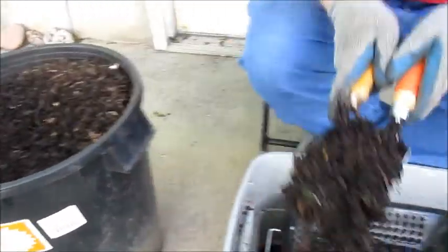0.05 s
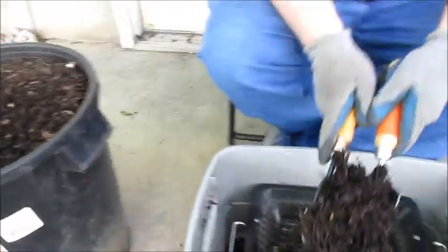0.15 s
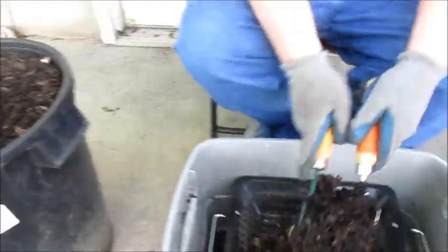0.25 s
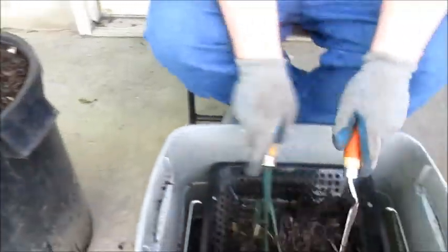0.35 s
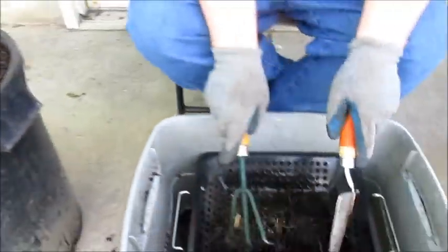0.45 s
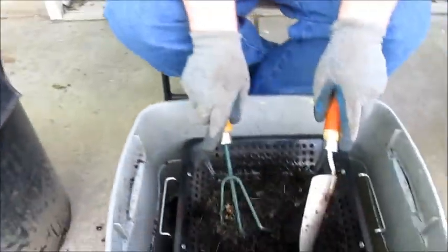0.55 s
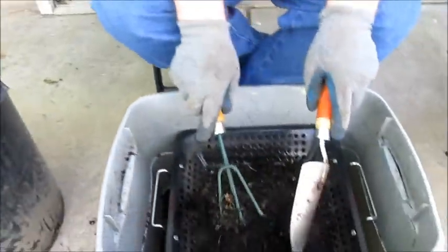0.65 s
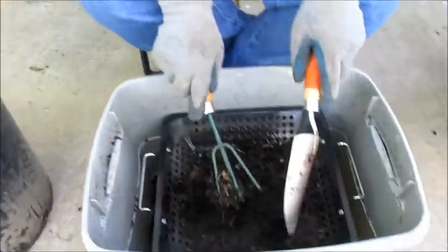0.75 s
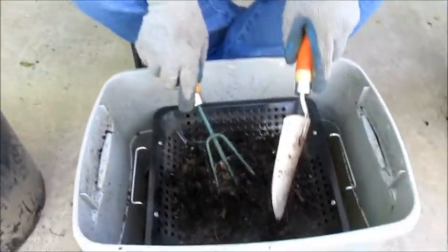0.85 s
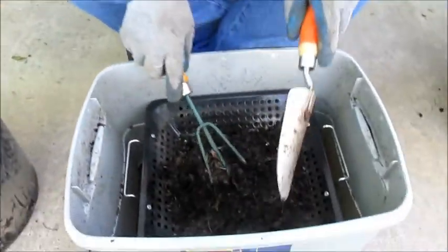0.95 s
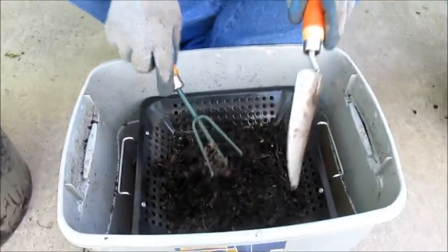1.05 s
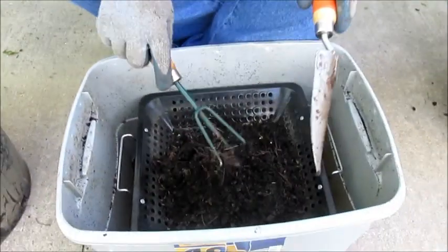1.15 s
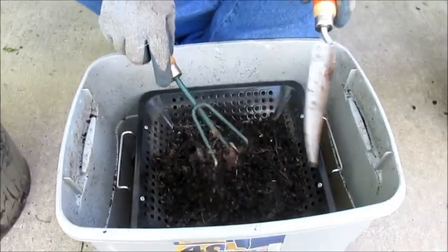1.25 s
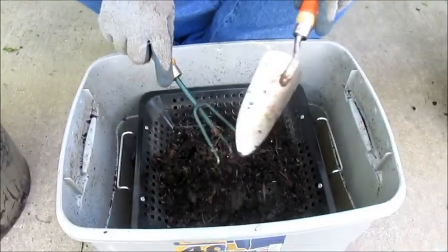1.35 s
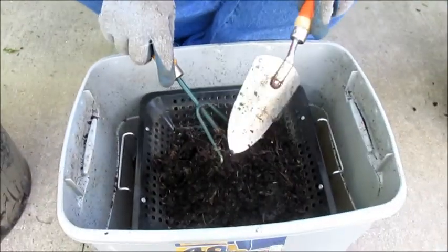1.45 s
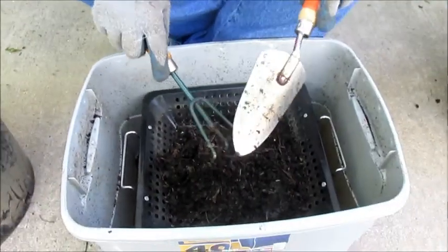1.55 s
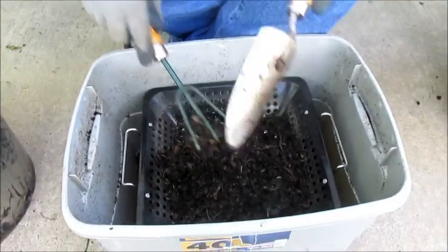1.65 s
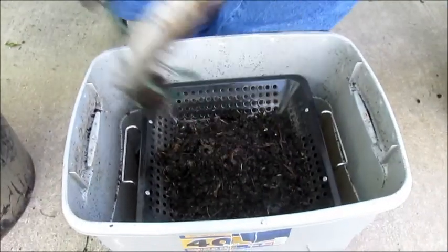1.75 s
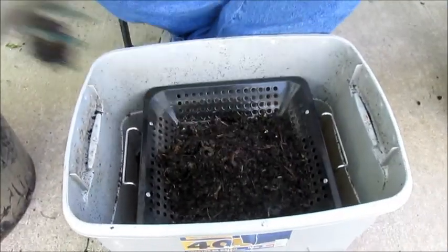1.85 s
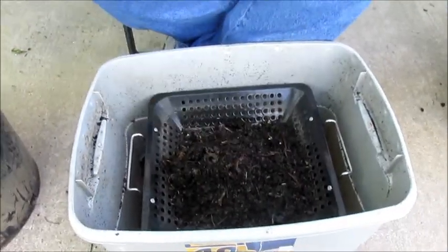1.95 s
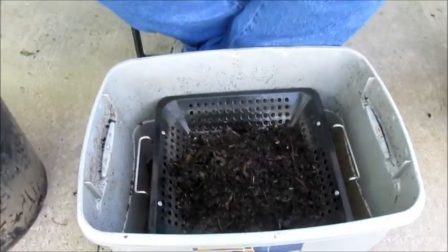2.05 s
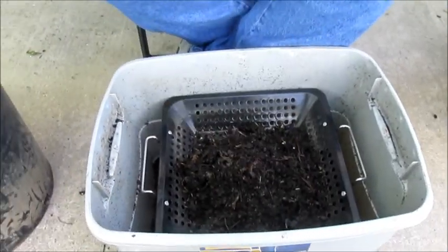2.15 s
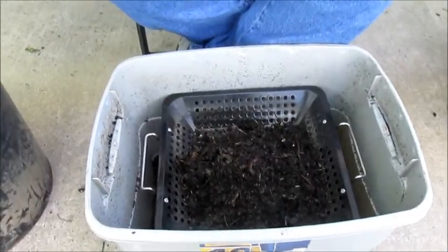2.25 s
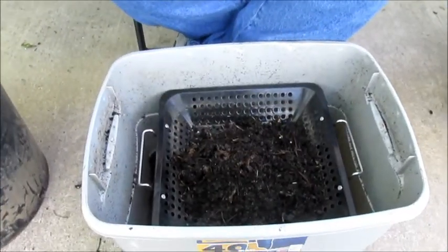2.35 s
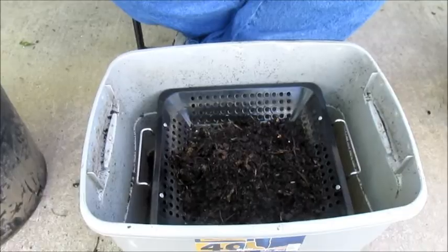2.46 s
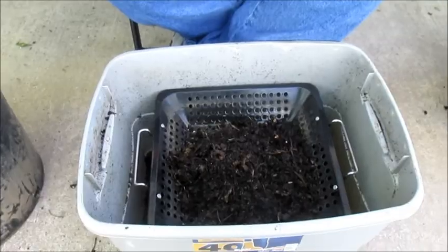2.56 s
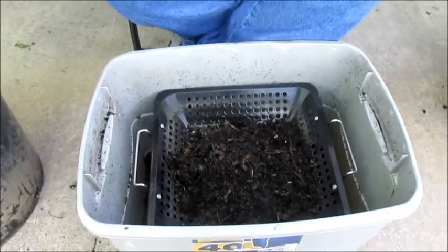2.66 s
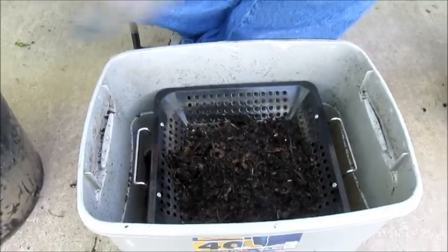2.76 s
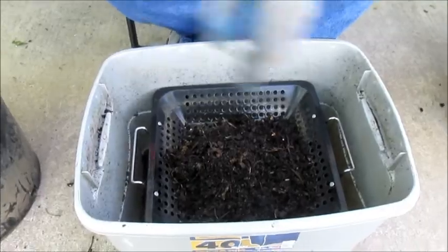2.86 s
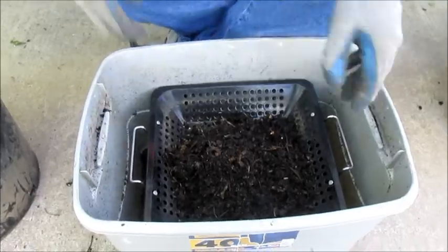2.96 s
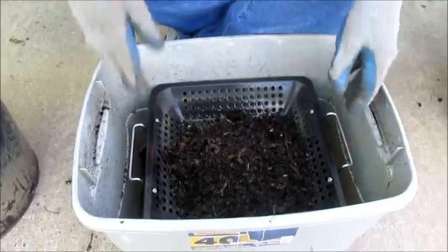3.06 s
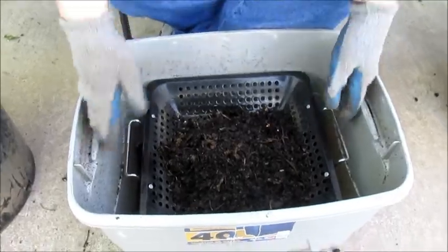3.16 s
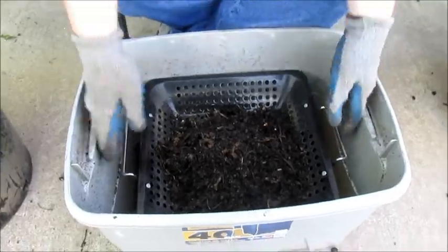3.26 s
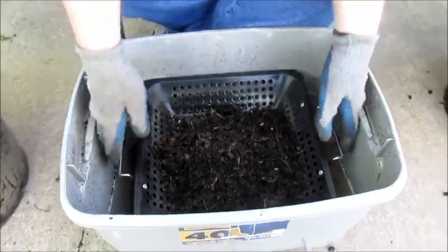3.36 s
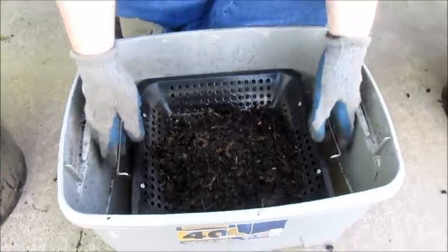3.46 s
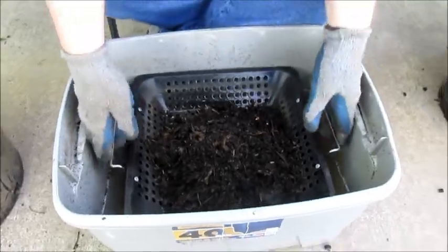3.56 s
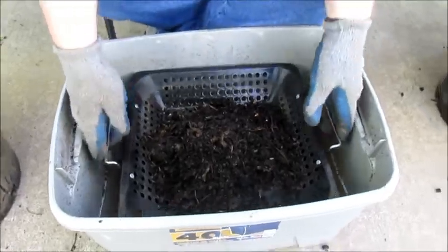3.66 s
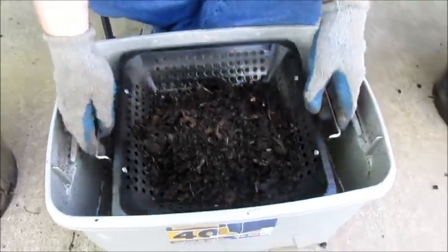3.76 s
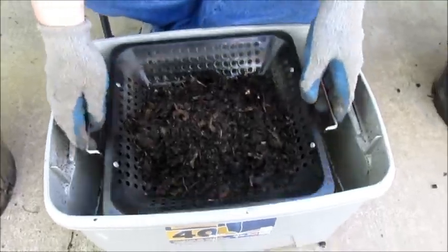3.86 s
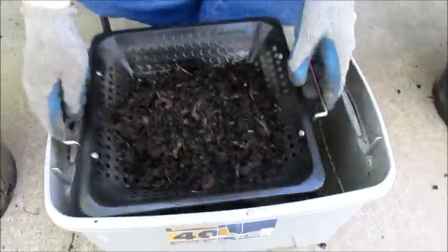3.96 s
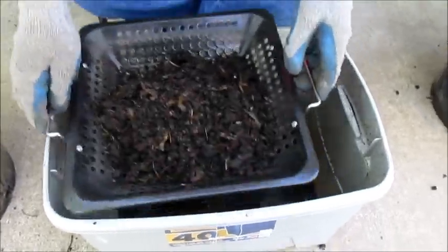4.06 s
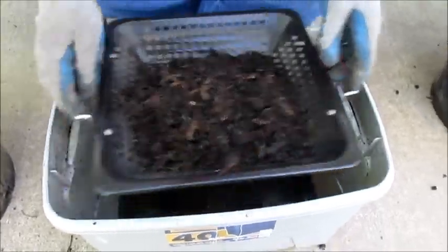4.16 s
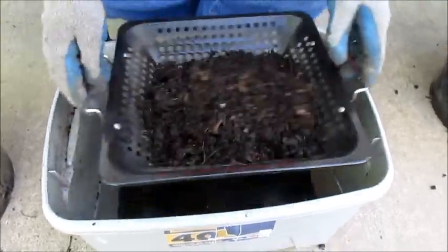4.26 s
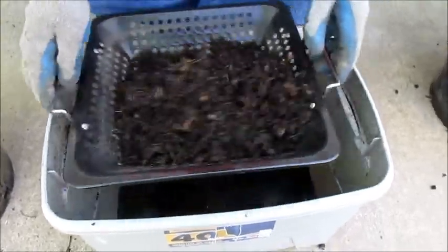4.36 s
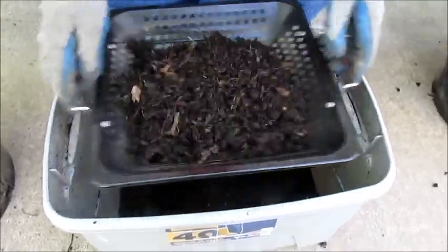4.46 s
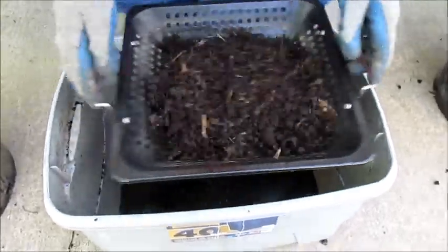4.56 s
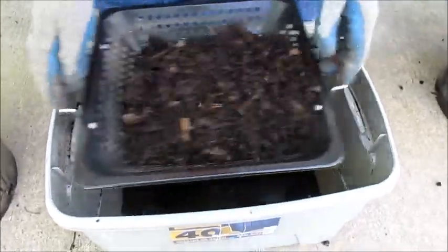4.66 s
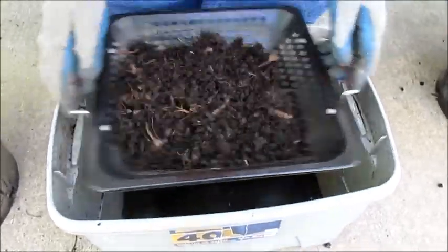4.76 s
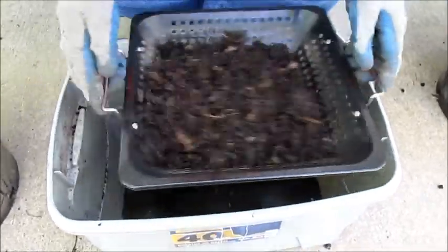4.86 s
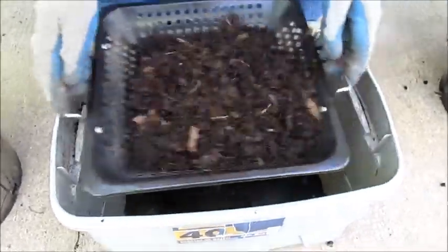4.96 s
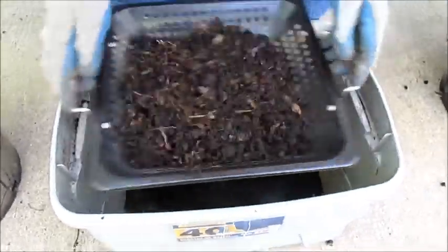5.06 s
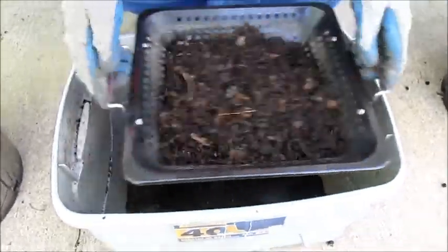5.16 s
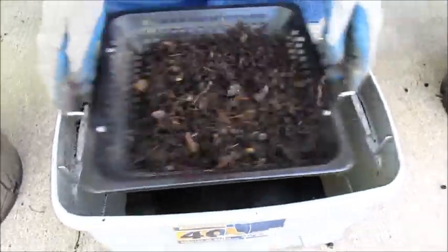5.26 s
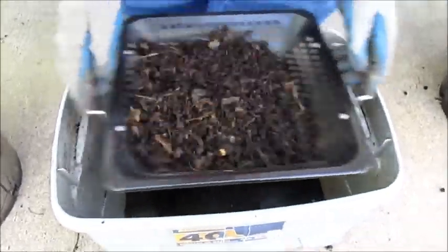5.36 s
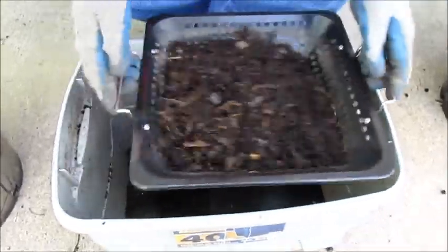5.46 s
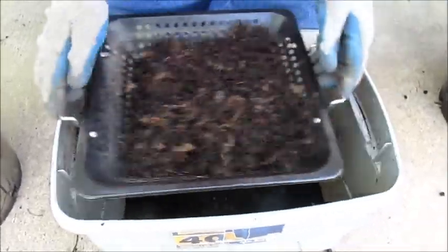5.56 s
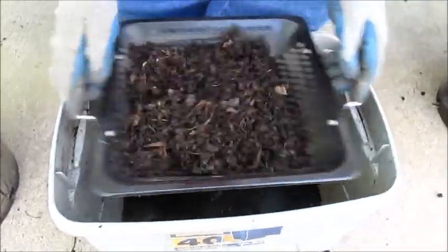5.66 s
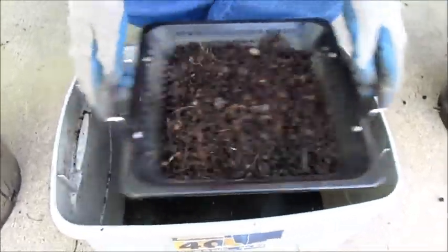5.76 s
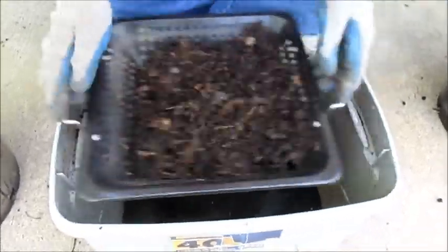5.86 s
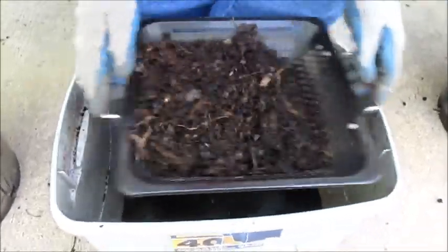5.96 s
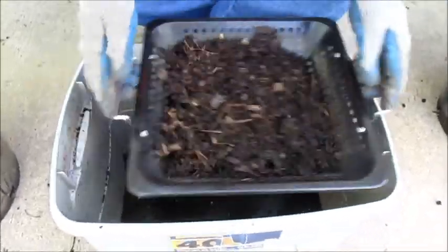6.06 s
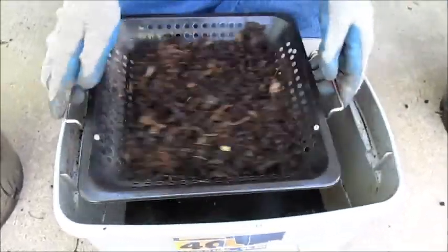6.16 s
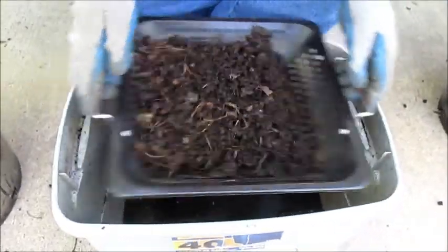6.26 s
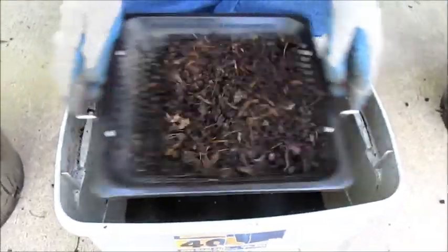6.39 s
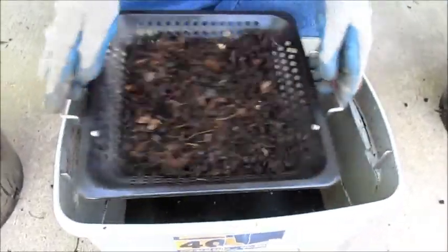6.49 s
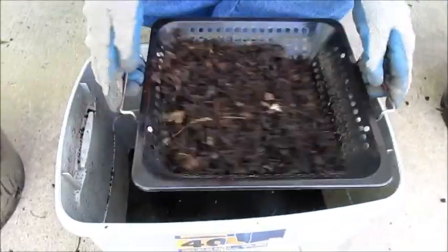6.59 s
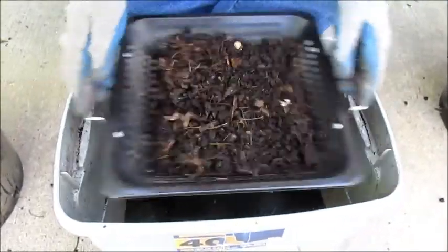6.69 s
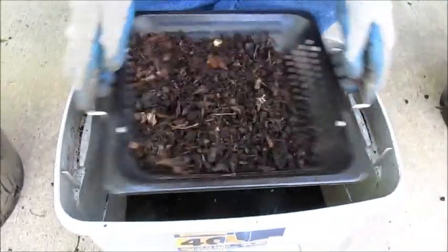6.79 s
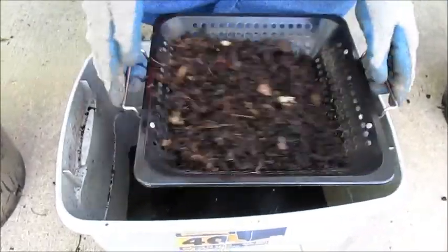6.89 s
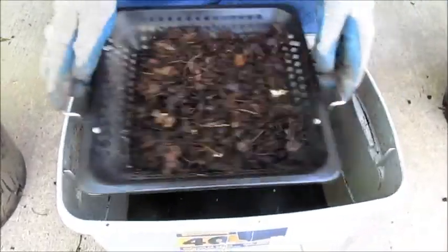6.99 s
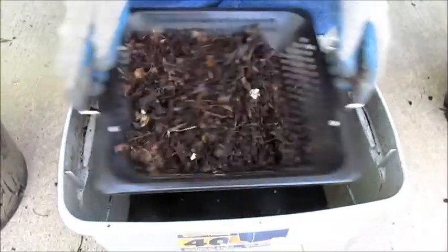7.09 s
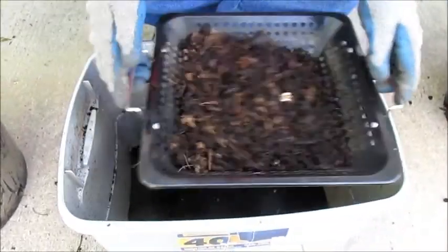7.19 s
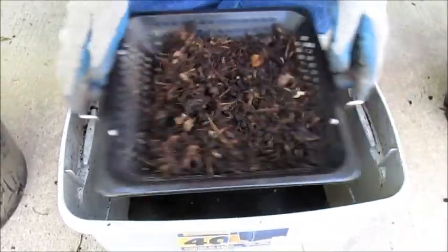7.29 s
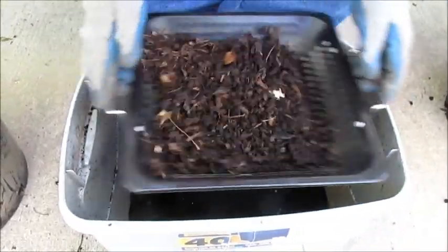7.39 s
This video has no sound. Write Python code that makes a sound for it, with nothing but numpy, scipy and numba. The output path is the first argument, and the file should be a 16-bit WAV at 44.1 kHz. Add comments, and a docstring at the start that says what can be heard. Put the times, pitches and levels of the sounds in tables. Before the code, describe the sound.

A quiet yard with low distant rumble and steady motor hum, heard close in stereo. From 0 to 0.7 s compost slides and patters into a perforated metal pan, with faint steel clinks at about 0.25 and 0.5 s. A small clink and light scrape follow near 0.9 s, then sparse crumbs, ticks and soft glove rustle. At 2.56 s a tool lands with a hard, dry knock, by far the loudest sound, with a tiny bounce. Around 3 to 3.3 s the pan rubs and bumps the plastic tote; a stronger rasp at 3.6 s ends in dull hollow thuds at 3.8 to 3.9 s. From 4.3 s shaking begins, roughly seven strokes a second: bright gritty swishes, slaps, chip ticks and pan taps, swelling by 6 s and continuing to about 7.4 s. A tiny squeak hides near 6.5 s.

```python
"""A distant machine hum, rustling sleeves and trickling crumbs open; compost then drops from hand tools into a
perforated metal pan. A tool is laid down with a knock; gloves lift the pan from a plastic tote and shake it, so
crumbs slide, slap the walls and rain through the holes. Granular noise makes crumbs, cloth and rasp; decaying
modes make the struck bodies; steady tones make the hum. Two close microphone ports with gain control hear it."""
import sys
import numpy as np
from scipy import signal
from scipy.fft import rfft, irfft, next_fast_len
from scipy.io import wavfile
from scipy.ndimage import uniform_filter1d
from numba import njit

SR = 44100
rng = np.random.default_rng(int(sys.argv[2]) if len(sys.argv) > 2 else 0)


def materialize(psi):
    """Save the field psi as 16-bit PCM at rate SR to the path in sys.argv[1].

    A 1-D psi becomes a single channel; in a 2-D psi each row is a channel.
    """
    bounded = np.clip(np.atleast_2d(psi).T, -1, 1)
    quanta = np.round(bounded * 32767).astype(np.int16)
    wavfile.write(sys.argv[1], SR, quanta)


N = 327663

# distant rumble and air, relative spectrum: freq_hz, density_db
YARD_SPECTRUM = [(25, -4.5), (70, 0.5), (125, -1), (161, -10.5), (242, -9.5), (439, -22.5), (641, -15.5),
                 (2220, -35.5), (4250, -41.5), (6380, -42), (10400, -49), (14800, -46), (16000, -65)]
# motor tones: shaft_multiple, rms_db
MOTOR_TONES = [(2, -68), (4, -51), (5, -50), (8, -67), (10, -67)]
YARD_RMS_DB, MAINS_RMS_DB = -45.5, -54
SHAFT_HZ, MAINS_HZ = 29.36, 120.04
IN_STEP_S = 0.16  # all tones peak together, beat loudest

# sleeves and gloves rustling: time_s, level_db
CLOTH_LEVEL = [(0, -68), (.9, -62), (1.25, -92), (1.45, -69), (1.75, -65.5), (2.2, -61), (2.4, -83),
               (2.65, -65), (2.85, -59), (3.15, -59), (3.5, -107), (4.2, -70)]
# cloth, relative spectrum: freq_hz, density_db
CLOTH_SPECTRUM = [(1500, -13), (3500, 1), (4400, -3), (5200, 6), (7000, -1), (9000, -2.5), (14000, -40),
                  (16000, 0)]

# trickle between the separate slides: time_s, crumb_level_db, clod_level_db
TRICKLE_LEVEL = [(0, -63, -56), (.75, -64, -57), (1.2, -65, -56), (1.3, -69.5, -64.5), (2.36, -61.5, -58.5),
                 (2.46, -73, -61), (2.95, -61.5, -57.5), (3.07, -58, -55), (3.45, -63.5, -57.5),
                 (3.72, -65, -51), (3.82, -53, -43), (3.87, -61.5, -52.5), (4.2, -65.5, -70),
                 (4.45, -54.5, -57), (5.5, -53.5, -54.5), (7.43, -51, -51.5)]
# compost dropped or shifted before the shaking: loudest_s, rise_s, fall_s, level_db
SLIDE_EVENTS = [(.37, 0.14, 0.27, -52), (.58, 0.29, 0.3, -51), (2.42, 0.1, 0.078, -57.5),
                (3.285, 0.022, 0.18, -52.5), (3.98, 0.2, 0.21, -55)]
# shaking strokes slide the load across: loudest_s, rise_s, level_db
SHAKE_STROKES = [(4.33, 0.12, -57), (4.399, 0.099, -53), (4.515, 0.06, -52.5), (4.66, 0.059, -51.5),
                 (4.85, 0.088, -51), (5.02, 0.071, -47.5), (5.131, 0.061, -45.5), (5.28, 0.11, -48),
                 (5.41, 0.032, -46.5), (5.59, 0.083, -46), (5.75, 0.088, -49), (5.89, 0.074, -45.5),
                 (6.02, 0.055, -41.5), (6.165, 0.038, -45.5), (6.32, 0.043, -41), (6.48, 0.13, -46),
                 (6.6, 0.031, -43.5), (6.77, 0.042, -44), (6.89, 0.061, -49), (7.045, 0.048, -43.5),
                 (7.181, 0.045, -42.5), (7.331, 0.044, -43)]
# coarse, middling and fine crumbs: low_hz, high_hz
CRUMB_BANDS = [(1000, 3200), (3200, 7500), (7500, 16500)]
# light crumbs on sheet metal, relative spectrum: freq_hz, density_db
CRUMB_SPECTRUM = [(880, -25), (1500, -1), (1670, -3.5), (1870, -4), (2720, -1), (3590, -1), (4000, -3.5),
                  (6430, 0), (10500, -8), (13900, -6), (16000, -9)]
# dull clods, relative spectrum: freq_hz, density_db
CLOD_SPECTRUM = [(150, 6), (300, 11.5), (600, 6.5), (1300, 6.5), (2000, -4), (3500, -8), (6000, -48)]
# thin rings of the perforated sheet: freq_hz
SHEET_RINGS = [2172, 3299, 3680, 4370, 5050, 5790, 6340, 6990]
SHEET_Q, SHEET_REL_DB = 120, -15
CLODS_FOLLOW_DB = -11.5  # clods tumble with every slide, under the crumbs
SHAKE_END_S, SLIDE_POWER, STROKE_POWER = 7.42, 6.2, 1.55
STOP_SHARE = 0.91  # load stops a little before the next stroke sets in
CHIPS_PER_S, CHIP_REL_DB, CHIP_SIZE_DB = 90.0, 0.5, -2
CHIP_LOW_HZ, CHIP_HIGH_HZ, CHIP_T60_CYCLES = 1260, 9540, 57
LUMPS_PER_S, LUMP_REL_DB, LUMP_SPREAD_DB = 60.0, -9.5, 3

# handfuls of crumbs slapping metal: start_s, nominal_peak_db, centre_hz, dust_rel_db
SLAP_EVENTS = [(0.175, -35.5, 6240, 7), (0.489, -34, 5900, -6), (0.525, -27.5, 4500, -8),
               (0.543, -27.5, 5900, -1), (0.574, -27, 4360, 1), (0.6457, -33, 6400, 13),
               (0.8692, -32, 5700, 2), (0.941, -36.5, 6560, -15), (1.527, -34, 6440, 1),
               (1.545, -35, 5940, -1), (3.824, -25.5, 2980, 3), (4.38, -32.5, 2600, -15),
               (4.503, -33.5, 6540, -14), (4.6918, -24.5, 6350, -3), (5.006, -21.5, 7650, -19),
               (5.108, -28, 6540, 17), (5.39, -32, 5690, -10), (5.5515, -36, 6300, -2),
               (5.6508, -29.5, 3000, -18), (5.956, -30.5, 2260, -9), (6.01, -22.5, 7060, -19),
               (6.1445, -23, 7100, 3), (6.205, -31, 3660, -3), (6.271, -28, 6800, -12),
               (6.309, -25.5, 6540, 1), (6.394, -30, 6690, 3), (6.5155, -31, 8490, -5),
               (6.572, -24.5, 8310, 2), (6.616, -19.5, 3700, -11), (6.731, -26, 7300, 0),
               (6.88, -24.5, 7000, 5), (7.027, -22, 6960, 6), (7.298, -27.5, 5030, -5)]
SLAP_T60_S, SLAP_REF_DB, LONGER_PER_DB = 0.081, -23, 0.1  # bigger handfuls patter longer
SLAP_RISE_S, SLAP_RING_REL_DB = 0.001, -10
CREST_DB = -10  # mean patter under its nominal peak

# steel tools touching: start_s, peak_db, best_excited_hz
CLINK_EVENTS = [(0.252, -37, 2590), (0.529, -32, 2780), (0.871, -41.5, 2420), (1.54, -44, 5800)]
# steel modes: freq_hz, gain_db, t60_s
STEEL_MODES = [(1850, 14, 0.06), (2460, 9, 0.081), (2830, 10.5, 0.06), (2930, 7, 0.066), (4060, -2, .05),
               (5400, 11, 0.022), (5820, 14, 0.038), (6400, 10, 0.03)]
GRIT_REL_DB, GRIT_T60_S, GRIT_REF_HZ = 2, 0.055, 2800  # higher contacts are shorter

# single hard bits on tools, pan and ground: start_s, peak_db, pitch_hz, ring_cycles
TICK_EVENTS = [(.371, -50, 3900, 60), (.372, -48, 2650, 27), (0.455, -37.5, 506, 12), (.578, -42, 6900, 90),
               (1.419, -35, 3600, 1.6), (1.527, -34, 1510, 3.3), (1.646, -44.5, 1890, 4.5),
               (2.096, -46, 4000, 8), (2.154, -39.5, 2630, 14), (2.622, -27, 1230, 10.4),
               (3.019, -26, 5600, 14), (4.504, -32, 2500, 2.5), (4.791, -31, 3200, 2.5),
               (5.466, -36, 1500, 3.6), (5.661, -30, 4500, 3), (5.83, -39, 3300, 3), (5.843, -33, 2200, 3),
               (6.397, -24, 3000, 1.6), (6.518, -33, 5500, 2), (6.7, -30, 2000, 3.4),
               (7.111, -30.5, 3000, 3.3)]

# pan bumps the tote, clods land in it: start_s, peak_db, best_excited_hz
BUMP_EVENTS = [(.452, -35.5, 182), (3.281, -26, 290), (3.293, -24.5, 109), (3.319, -32.5, 118),
               (3.811, -24, 111), (3.826, -23, 148), (3.84, -28, 96), (3.858, -23.5, 119),
               (3.9195, -23, 340), (7.214, -34.5, 274)]
# tote modes: freq_hz, gain_db, t60_s
TOTE_MODES = [(83.3, -2, 0.17), (106, 2.5, 0.085), (172, 0.5, 0.14), (237, 3, 0.16), (289, 8.5, 0.076),
              (485, 2.5, 0.037), (834, 25.5, 0.039)]

# pan and tote rub together: start_s, length_s, rasp_level_db, stirred_crumb_level_db
RUB_EVENTS = [(0.904, 0.34, -63.5, -70), (3.01, 0.19, -54, -79), (3.338, 0.136, -52.5, -66),
              (3.574, 0.26, -47.5, -51.5)]
# broad pan resonances in the rasp, relative levels: freq_hz, width_hz, level_db
RIM_RESONANCES = [(310, 39, 0.5), (720, 720, 4.5), (1320, 120, 0), (1456, 80, 1), (1880, 1200, -15),
                  (3580, 250, -15)]
DRAG_ATTACK_S, DRAG_RELEASE_S = 0.062, 0.022

# tool handle knocks on a hard surface and bounces: start_s, peak_db, best_excited_hz
KNOCK_EVENTS = [(2.5633, -6, 714), (2.62, -21.5, 400)]
# handle modes: freq_hz, gain_db, t60_s
HANDLE_MODES = [(235, 11.5, 0.047), (348, 2, 0.034), (497, -9.5, 0.05), (650, 7, 0.012), (758, 9.5, 0.0093),
                (1200, 3.5, 0.014), (1640, -7.5, 0.019), (2260, -3.5, 0.016), (3280, 2, 0.015)]
CRACK_REL_DB, CRACK_HZ, CRACK_T60_S = -23.5, 3800, 0.024

# twigs and lumps tap the pan: start_s, peak_db, best_excited_hz
TAP_EVENTS = [(3.826, -22, 750), (3.921, -34.5, 786), (4.696, -39, 746), (4.736, -36.5, 624),
              (5.081, -33.5, 1310), (5.264, -33.5, 643), (5.392, -32.5, 686), (5.464, -31, 900),
              (5.508, -35, 780), (5.551, -29, 1210), (5.623, -35.5, 1300), (5.647, -34.5, 640),
              (5.786, -35, 1100), (6.161, -34.5, 770), (6.205, -32.5, 1190), (6.492, -30.5, 804),
              (6.527, -36.5, 1230), (6.739, -28.5, 875), (6.749, -39, 750), (7.2105, -26, 620),
              (7.2365, -26.5, 680), (7.252, -31, 1200)]
# pan modes: freq_hz, gain_db, t60_s
PAN_MODES = [(634, 7.5, 0.044), (805, 14, 0.011), (1077, -0.5, 0.037), (1228, 13, 0.015),
             (1472, 0.5, 0.052), (1880, 6.5, 0.048)]

SQUEAK_S, SQUEAK_LENGTH_S, SQUEAK_HZ, SQUEAK_PEAK_DB = 6.526, 0.029, 1550, -41

# gain on the side signal: freq_hz, gain_db
SIDE_GAIN = [(60, -13), (200, -9.5), (700, -9.5), (1290, -7.5), (2380, -5.5), (4400, -3), (8120, 0),
             (15000, 3)]
# port tilt, nearly all of it on the left: freq_hz, gain_db
PORT_TILT = [(60, 0.5), (200, 0.5), (700, -1), (2380, -2), (4400, -2.5), (8120, 1), (15000, 0)]
NOTCH_HZ, LOW_CUT_HZ, TOP_HZ = 7880, 32, 15800
LIMIT_DB, DUCK_POWER, RELEASE_S = -24.5, 0.23, 0.35


def undb(db):
    """dB to gain."""
    return 10 ** (np.asarray(db) / 20)


def level(x, db):
    """Set the rms level."""
    return x * undb(db) / np.sqrt(np.mean(x ** 2))


def colour(x, table, share=1):
    """Filter by (freq_hz, gain_db) points, the dB scaled by share."""
    size = next_fast_len(N)
    hz, db = np.transpose(table)
    log_hz = np.log(np.arange(size // 2 + 1) * SR / size + 1e-3)
    gain = undb(share * np.interp(log_hz, np.log(hz), db))
    return irfft(rfft(x, size) * gain, size)[..., :N]


def curve(table):
    """Columns joined by straight lines, one value a sample."""
    s, *columns = np.transpose(table)
    return [np.interp(np.arange(N) / SR, s, c) for c in columns]


def walk(rate_hz):
    """Random levels held 1 / rate_hz and smoothed twice."""
    k = int(SR / rate_hz)
    steps = np.repeat(rng.standard_normal(N // k + 1), k)
    return 1.7 * uniform_filter1d(uniform_filter1d(steps, k), k)[:N]


def add(out, s, sound):
    """Mix a sound in at s seconds."""
    i = int(s * SR)
    out[..., i:i + sound.shape[-1]] += sound[..., :N - i]


def decay(t, t60_s):
    """Exponential fall of 60 dB in t60_s."""
    return np.exp(-np.log(1000) * t / t60_s)


def grains(count, per_s, spread_db, hiss, ring_s):
    """Uneven short noise bursts over a bed of finer hiss; mid and side, rms 1."""
    sizes = undb(spread_db * np.minimum(rng.exponential(size=count), 3.5))
    hits = (rng.random(count) < per_s / SR) * sizes
    bursts = signal.lfilter([1], [1, -np.exp(-1 / (ring_s * SR))], hits)
    return level(rng.standard_normal((2, count)) * (bursts + hiss), 0)


def strike(blows, modes, octaves, push_cycles, order=1):
    """Each blow rings one body: modes near its best excited pitch most; low modes build up later."""
    out, t = np.zeros(N), np.arange(int(.25 * SR)) / SR
    hz, db, t60 = np.transpose(modes)[:, :, None]
    chance = rng.standard_normal((len(blows), 2, len(modes), 1))
    for (s, peak_db, best_hz), (detune, place_db) in zip(blows, chance):
        gain = undb(db - 6 * (np.log2(hz / best_hz) / octaves) ** 2 + place_db)
        ring = gain * np.sin(2 * np.pi * hz * (1 + .012 * detune) * t) * decay(t, t60)
        build_up = (1 - np.exp(-t * hz / push_cycles)) ** order
        ring = np.sum(ring * build_up, axis=0)
        add(out, s, ring * undb(peak_db) / np.abs(ring).max())
    return out


def patter(bursts, dust_rel_db):
    """Bursts of crumbs (start_s, nominal_peak_db, centre_hz, t60_s) with finer dust on top."""
    out, t = np.zeros((2, N)), np.arange(int(.15 * SR)) / SR
    dust_filter = signal.butter(2, 8000, "high", fs=SR)
    rise = 1 - np.exp(-t / SLAP_RISE_S)
    for (s, peak_db, hz, t60), dust_db in zip(bursts, dust_rel_db):
        source = grains(count=len(t), per_s=800., spread_db=5., hiss=2., ring_s=.0002)
        band = signal.butter(1, [hz / 1.42, min(hz * 1.34, .45 * SR)], "band", fs=SR)
        crumbs = level(signal.lfilter(*band, source), 0)
        dust = level(signal.lfilter(*dust_filter, source), dust_db)
        shape = rise * decay(t, max(t60, .005))
        sound = (crumbs + dust) * shape
        mean = np.sqrt(np.mean(sound ** 2) / np.mean(shape ** 2))
        add(out, s, undb(peak_db + CREST_DB) * sound / mean)
    return out


def sheet(x):
    """Thin rings of the perforated sheet, as narrow resonators."""
    return sum(signal.lfilter(*signal.iirpeak(hz, SHEET_Q, fs=SR), x) for hz in SHEET_RINGS)


def yard():
    """Slowly swelling rumble and air; a motor's steady tones beat against its mains buzz."""
    t = np.arange(N) / SR - IN_STEP_S
    air = level(colour(rng.standard_normal((2, N)), YARD_SPECTRUM), YARD_RMS_DB) * undb(.5 * walk(4.0))
    lines = [(round(k) * SHAFT_HZ, db) for k, db in MOTOR_TONES] + [(MAINS_HZ, MAINS_RMS_DB)]
    tones = 0
    for hz, db in lines:
        tones = tones + undb(db + .5 * walk(2.88)) * np.sqrt(2) * np.cos(2 * np.pi * hz * t)
    return air + tones * np.array([[1], [.2]])


def cloth():
    """Fibres catching and slipping: dense grains in a whispering spectrum."""
    rustle = grains(count=N, per_s=210.0, spread_db=-15.0, hiss=8.6, ring_s=0.0049)
    return level(colour(rustle, CLOTH_SPECTRUM), 0) * undb(curve(CLOTH_LEVEL)[0])


def compost():
    """Sliding crumbs, clods, chips and lumps; the load never moves evenly. Rows: mid, side."""
    crumb_db, clod_db = curve(TRICKLE_LEVEL)
    effort = np.hypot(undb(crumb_db), sliding())
    crumbs = 0
    for band in CRUMB_BANDS:  # each size ticks at its own moments
        source = grains(count=N, per_s=140., spread_db=3.1, hiss=1.4, ring_s=.0016)
        crumbs = crumbs + signal.lfilter(*signal.butter(2, band, "band", fs=SR), source)
    crumbs = level(colour(crumbs, CRUMB_SPECTRUM), 0)
    crumbs = crumbs + level(sheet(crumbs), SHEET_REL_DB)
    clods = grains(count=N, per_s=76.0, spread_db=-2.5, hiss=0.67, ring_s=0.0031)
    clods = level(colour(clods, CLOD_SPECTRUM), 0)
    clod_gain = np.hypot(undb(clod_db), undb(CLODS_FOLLOW_DB) * effort)
    load = undb(0.75 * walk(40)) * (effort * crumbs + clods * clod_gain)
    return load + chips(effort) + lumps(effort)


def sliding():
    """Load movement gain: every slide, every stroke until the next sets in, and the drag."""
    rests = [s - rise for s, rise, _ in SHAKE_STROKES[1:]] + [SHAKE_END_S]
    total = dragging()[1]
    for (s, rise, db), rest in zip(SHAKE_STROKES, rests):
        total = total + swell(s, rise, STOP_SHARE * (rest - s), db, STROKE_POWER)
    return total + sum(swell(*row, SLIDE_POWER) for row in SLIDE_EVENTS)


def swell(peak_s, rise_s, fall_s, db, power):
    """A rounded rise and fall of gain."""
    t = np.arange(N) / SR
    corners_s = [peak_s - max(rise_s, .01), peak_s, peak_s + max(fall_s, .01)]
    turn = np.interp(t, corners_s, [0, np.pi / 2, np.pi])
    return undb(db) * np.abs(np.sin(turn)) ** power


def chips(effort):
    """Bark chips and grit tick on the metal, each at its own pitch and place."""
    out, count = np.zeros((2, N)), int(CHIPS_PER_S * N / SR)
    t = np.arange(int(.02 * SR)) / SR
    for when, pitch, size, place in rng.random((count, 4)):
        hz = CHIP_LOW_HZ * (CHIP_HIGH_HZ / CHIP_LOW_HZ) ** pitch
        tick = np.sin(2 * np.pi * hz * t) * decay(t, CHIP_T60_CYCLES / hz)
        gain = effort[int(when * N)] * undb(CHIP_REL_DB - CHIP_SIZE_DB * np.log(size + 0.15))
        add(out, when * N / SR, gain * tick * np.array([[1], [2 * place - 1]]))
    return out


def lumps(effort):
    """Scattered lumps each knock the pan's modes in their own mix."""
    sizes = undb(LUMP_SPREAD_DB * np.minimum(rng.exponential(size=N), 2))
    hits = (rng.random(N) < LUMPS_PER_S / SR) * sizes
    out = 0
    for hz, db, t60 in PAN_MODES:
        pole = np.exp(2j * np.pi * hz / SR - np.log(1000) / (t60 * SR))
        out = out + undb(db) * signal.lfilter([1], [1, -pole], hits * rng.standard_normal(N)).imag
    smooth_effort = uniform_filter1d(effort, size=SR // 4)
    return level(out, LUMP_REL_DB) * smooth_effort * np.array([[1], [.4]])


def slaps():
    """Handfuls arrive nearly at once, patter on and ring the sheet."""
    rows = []
    for s, db, hz, _ in SLAP_EVENTS:
        rows.append((s, db, hz, SLAP_T60_S * np.exp(LONGER_PER_DB * (db - SLAP_REF_DB))))
    handfuls = patter(rows, [row[-1] for row in SLAP_EVENTS])
    ring = sheet(handfuls)
    return handfuls + ring * undb(SLAP_RING_REL_DB) * np.std(handfuls) / np.std(ring)


def clinks():
    """Touching steel tools ring their modes."""
    return strike(CLINK_EVENTS, STEEL_MODES, octaves=0.53, push_cycles=0.11)


def crushed_grit():
    """Grit crushed in each clink patters over its ring."""
    rows = [(s, db + GRIT_REL_DB, hz, GRIT_T60_S * (GRIT_REF_HZ / hz) ** 2) for s, db, hz in CLINK_EVENTS]
    return patter(rows, np.full(len(rows), -12.))


def ticks():
    """Hard bits: each tick is a tone whose ring dies in a set number of cycles."""
    out, t = np.zeros(N), np.arange(int(.04 * SR)) / SR
    for s, peak_db, hz, cycles in TICK_EVENTS:
        attack = 1 - np.exp(-10 * t * hz / cycles)
        tick = np.sin(2 * np.pi * hz * t) * decay(t, max(cycles, 1) / hz) * attack
        add(out, s, undb(peak_db) * tick / np.abs(tick).max())
    return out


def bumps():
    """Pan and clods excite the plastic tote's low modes."""
    return strike(BUMP_EVENTS, TOTE_MODES, octaves=0.56, push_cycles=1.0)


def rubs():
    """The dragged rim rasps in stick-slip through the pan's broad resonances."""
    slip = grains(count=N, per_s=500., spread_db=1.5, hiss=1.2, ring_s=.0006)
    rasp = 0
    for hz, width_hz, db in RIM_RESONANCES:
        rasp = rasp + level(signal.lfilter(*signal.iirpeak(hz, hz / width_hz, fs=SR), slip), db)
    return level(rasp, 0) * dragging()[0]


def dragging():
    """Gains of rasp and stirred crumbs: attack, hold, release."""
    t = np.arange(N) / SR
    out = np.zeros((2, N))
    for s, length_s, *db in RUB_EVENTS:
        ramps = np.minimum((t - s) / DRAG_ATTACK_S, (s + length_s - t) / DRAG_RELEASE_S)
        out += undb(db)[:, None] * np.clip(ramps, 0, 1)
    return out


def knocks():
    """The tool handle rings its modes as it lands and bounces."""
    return strike(KNOCK_EVENTS, HANDLE_MODES, octaves=0.95, push_cycles=0.81, order=2)


def knock_cracks():
    """A dry noise crack starts each knock."""
    rows = [(s, db + CRACK_REL_DB, CRACK_HZ, CRACK_T60_S) for s, db, _ in KNOCK_EVENTS]
    return patter(rows, np.full(len(rows), -12.))


def taps():
    """Twigs and lumps excite the pan's modes."""
    return strike(TAP_EVENTS, PAN_MODES, octaves=0.77, push_cycles=0.27)


def squeak():
    """A wire handle squeaks in its hinge: one short tone, quick to rise and slower to fade."""
    out, t = np.zeros(N), np.arange(int(SQUEAK_LENGTH_S * SR)) / SR
    shape = np.sin(np.pi * np.sqrt(t / SQUEAK_LENGTH_S))
    add(out, SQUEAK_S, undb(SQUEAK_PEAK_DB) * shape * np.sin(2 * np.pi * SQUEAK_HZ * t))
    return out


def scattered(hits):
    """Tote walls and ground return each hit as a short scatter, independent in mid and side."""
    t = np.arange(int(.06 * SR)) / SR
    scatter = rng.standard_normal((2, len(t))) * np.exp(-t / 0.013) * undb(-30.0)
    scatter = signal.lfilter(*signal.butter(1, 500, "high", fs=SR), scatter)  # bass scatters less
    return signal.fftconvolve(hits[None], scatter, axes=1)[:, :N]


def scene():
    """All sources as mid and side, then the two ports."""
    hits = clinks() + ticks() + bumps() + knocks() + taps() + squeak()
    grainy = cloth() + compost() + slaps() + crushed_grit() + rubs() + knock_cracks()
    mid, side = yard() + grainy + scattered(hits) + hits * np.array([[1], [.4]])
    side = colour(side, SIDE_GAIN)  # close ports agree on the bass, disagree on the treble
    left = colour(mid + side, PORT_TILT, 1.0)
    right = colour(mid - side, PORT_TILT, 0.027)
    return np.array([left, right])


@njit
def follow(x, release):
    """Peak follower: jumps up, sinks slowly."""
    e, y = 0., np.empty(len(x))
    for i in range(len(x)):
        e = max(x[i], e * release)
        y[i] = e
    return y


def record(dry):
    """Gain control ducks after loud hits and creeps back; narrow treble dip; lowest bass and top cut."""
    peak = follow(np.abs(dry).max(axis=0), np.exp(-1 / (RELEASE_S * SR)))
    gain = np.minimum(1, undb(LIMIT_DB) / (peak + 1e-9)) ** DUCK_POWER
    # 25 ms smoothing that also deepens the duck by 25 / 21
    gain = signal.lfilter([1 / (0.021 * SR)], [1, 1 / (0.025 * SR) - 1], gain - 1) + 1
    x = signal.lfilter(*signal.iirnotch(NOTCH_HZ, 60., fs=SR), dry * gain)
    x = signal.lfilter(*signal.butter(2, LOW_CUT_HZ, "high", fs=SR), x)
    return signal.sosfilt(signal.ellip(10, .2, 70, TOP_HZ, fs=SR, output="sos"), x)


dry = scene()
out = record(dry)
materialize(out)
```